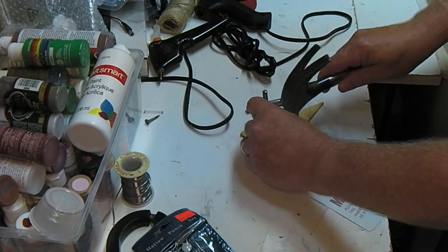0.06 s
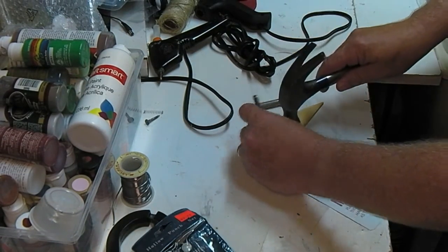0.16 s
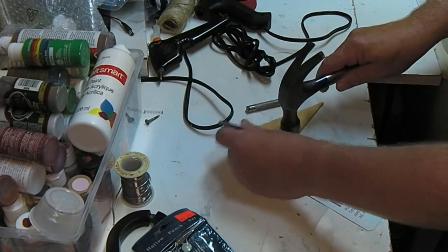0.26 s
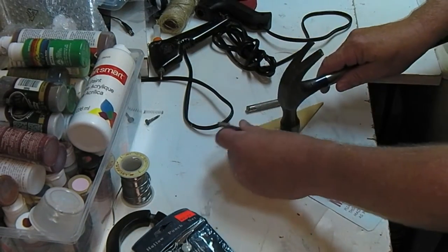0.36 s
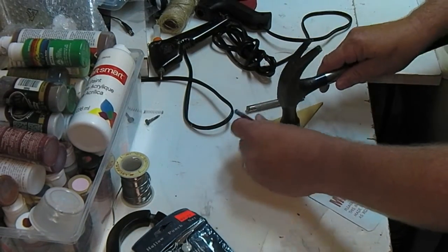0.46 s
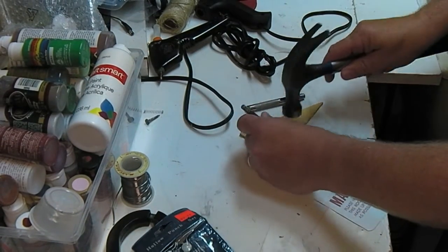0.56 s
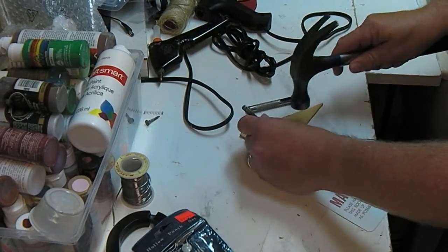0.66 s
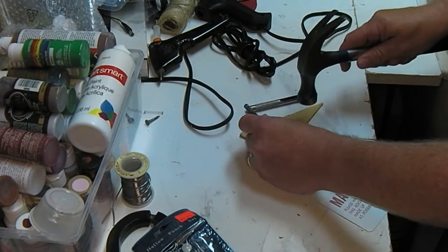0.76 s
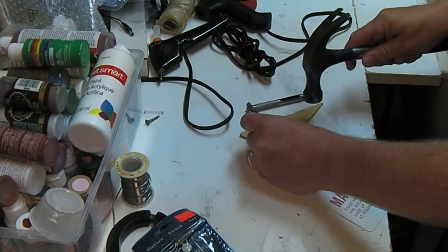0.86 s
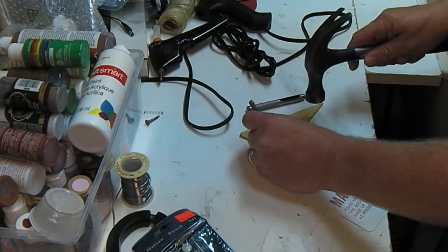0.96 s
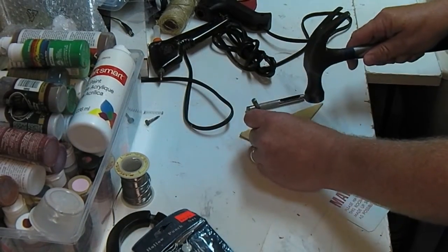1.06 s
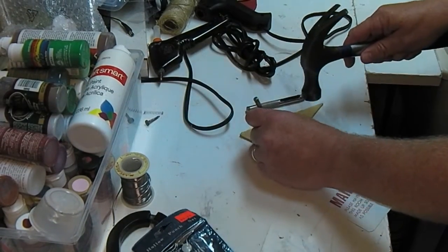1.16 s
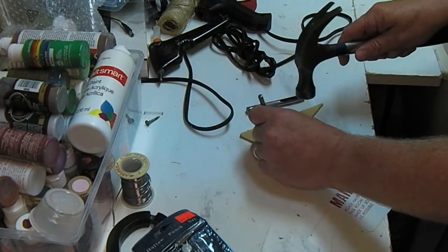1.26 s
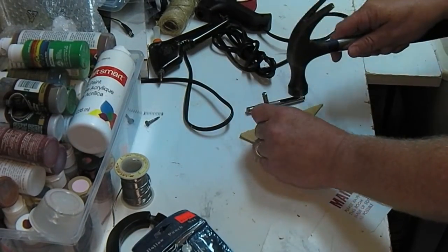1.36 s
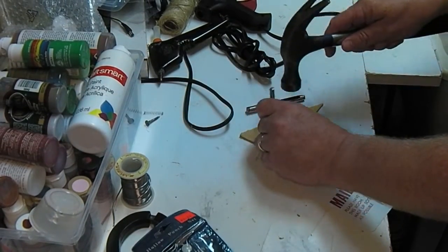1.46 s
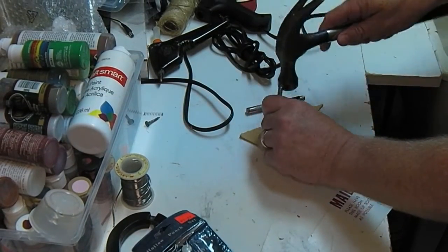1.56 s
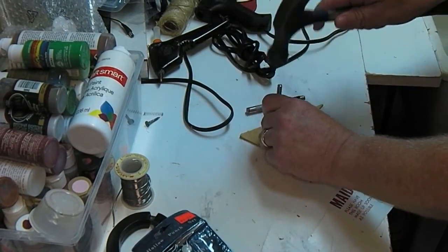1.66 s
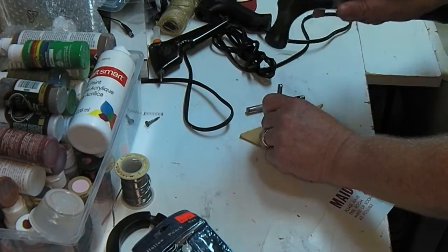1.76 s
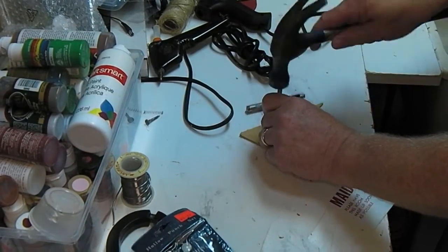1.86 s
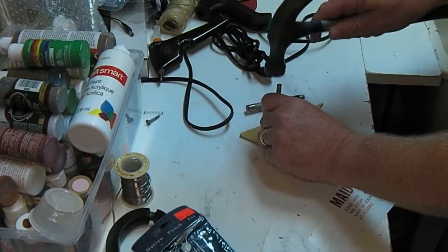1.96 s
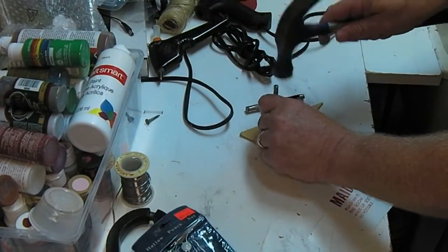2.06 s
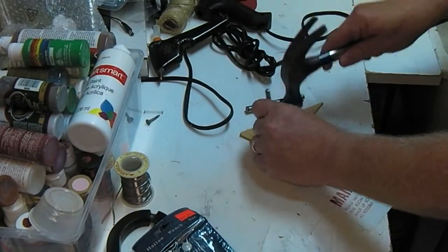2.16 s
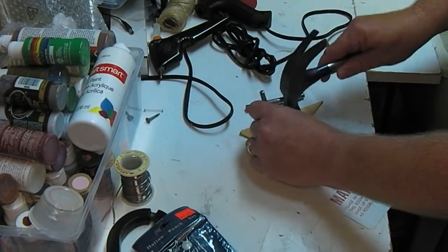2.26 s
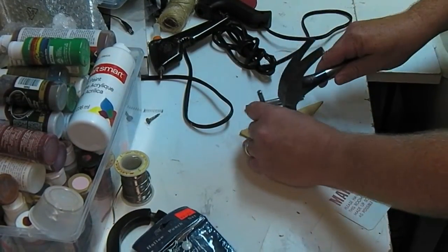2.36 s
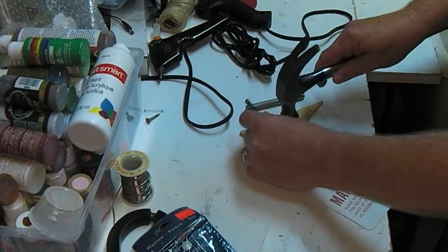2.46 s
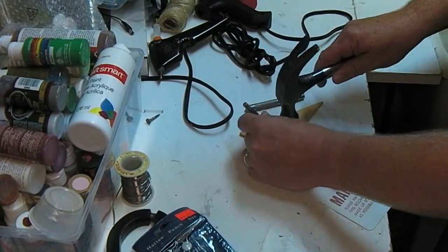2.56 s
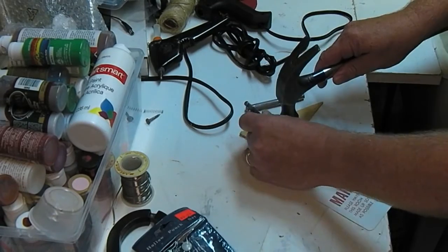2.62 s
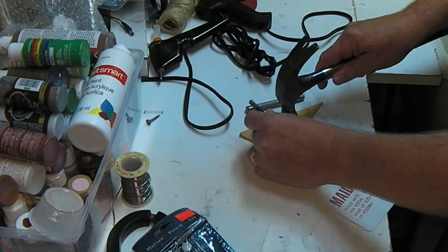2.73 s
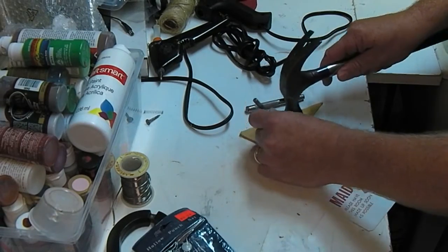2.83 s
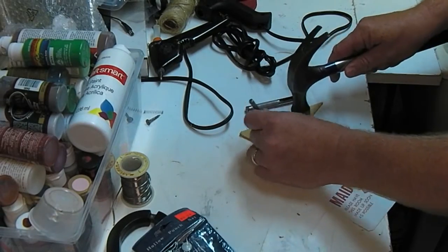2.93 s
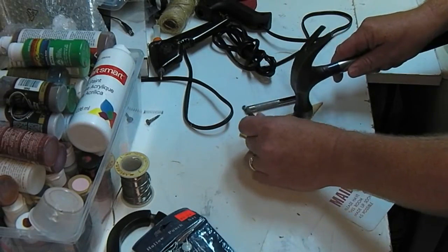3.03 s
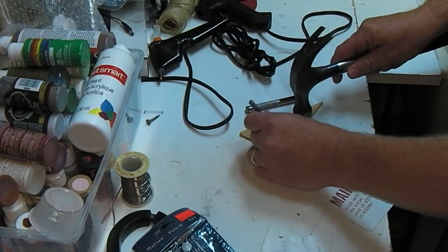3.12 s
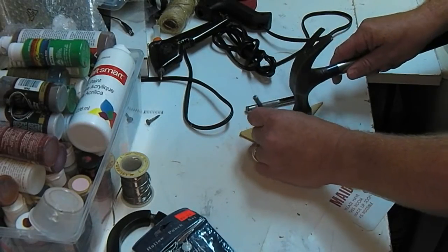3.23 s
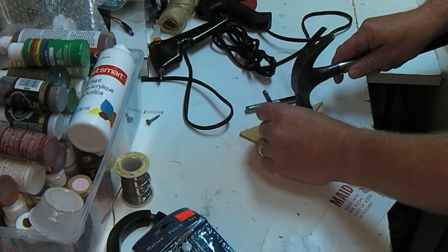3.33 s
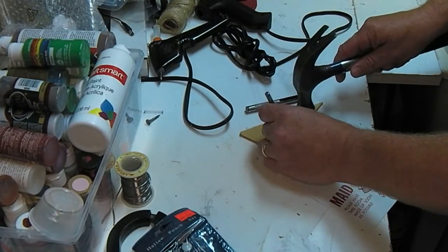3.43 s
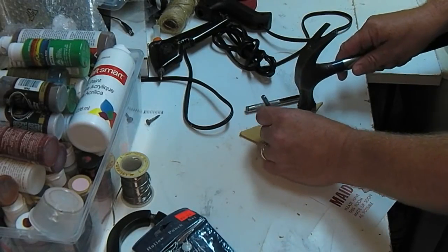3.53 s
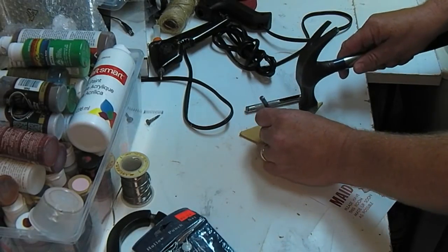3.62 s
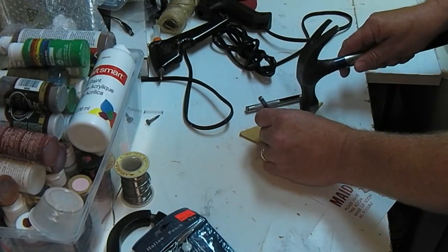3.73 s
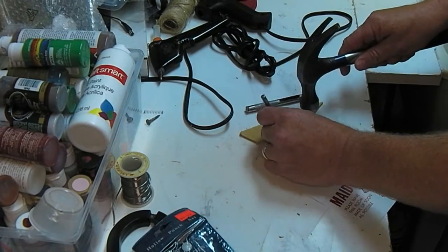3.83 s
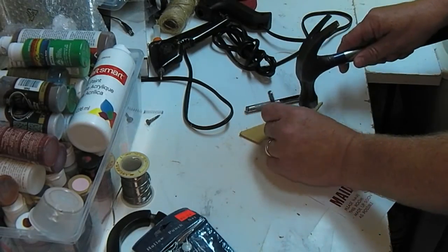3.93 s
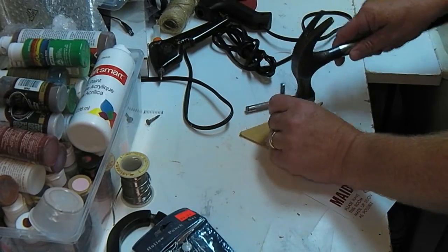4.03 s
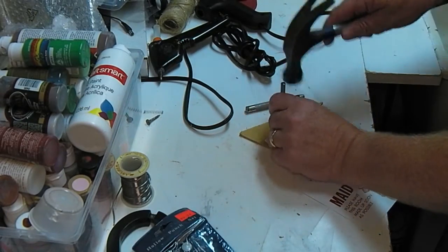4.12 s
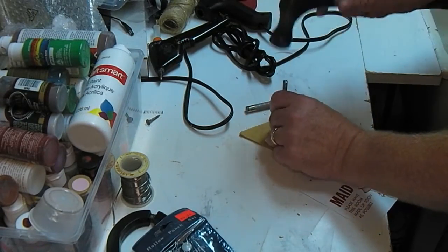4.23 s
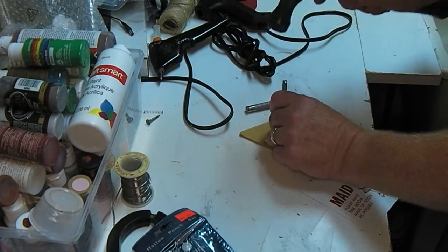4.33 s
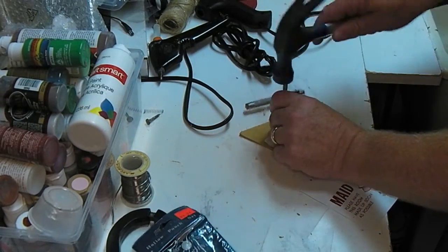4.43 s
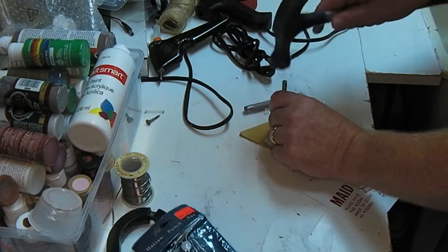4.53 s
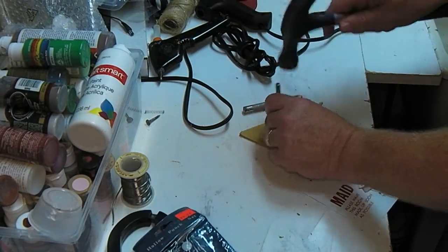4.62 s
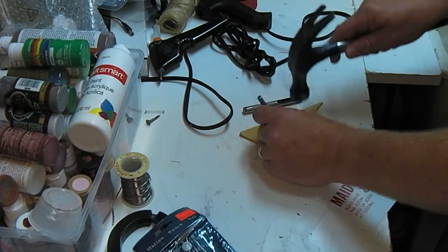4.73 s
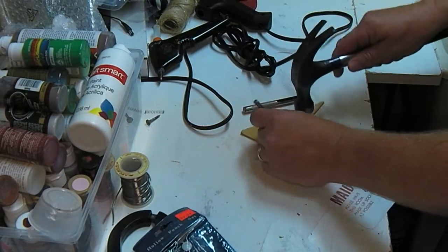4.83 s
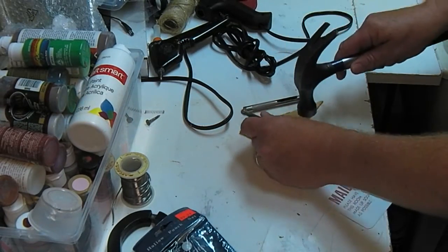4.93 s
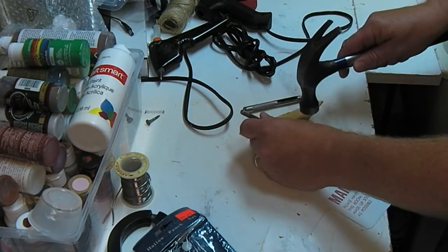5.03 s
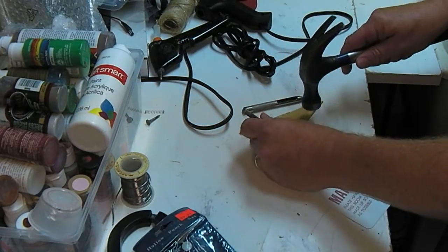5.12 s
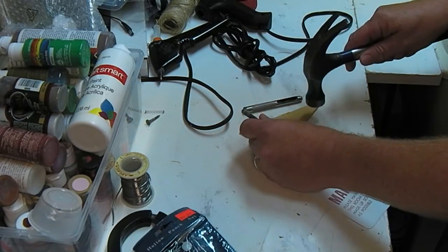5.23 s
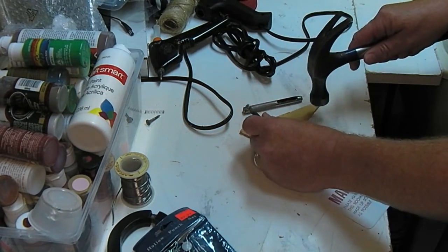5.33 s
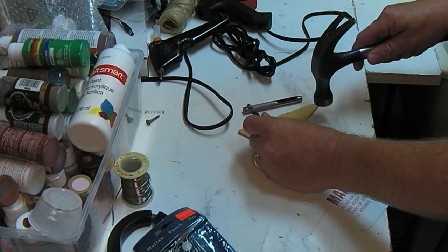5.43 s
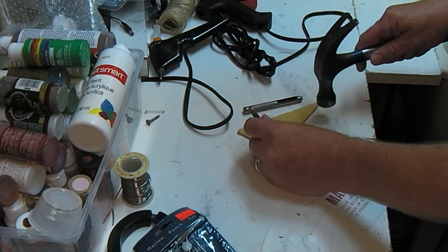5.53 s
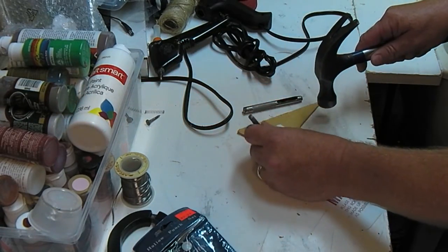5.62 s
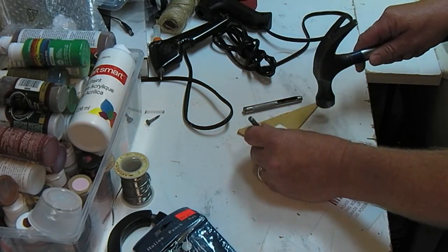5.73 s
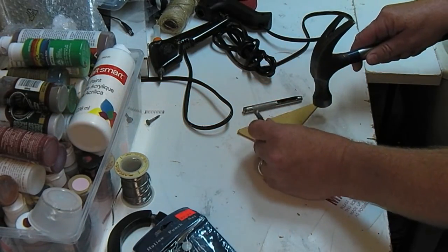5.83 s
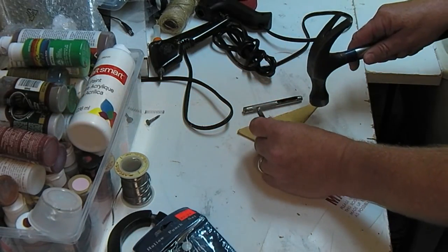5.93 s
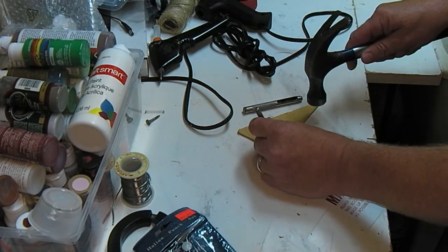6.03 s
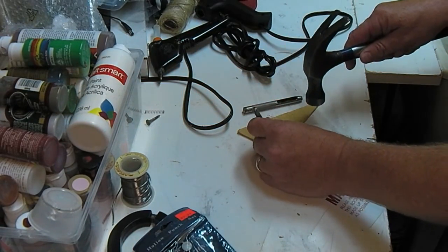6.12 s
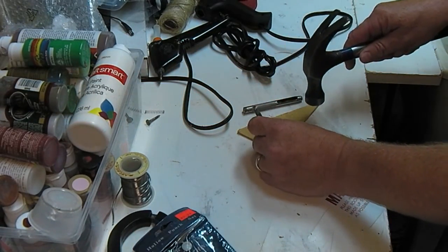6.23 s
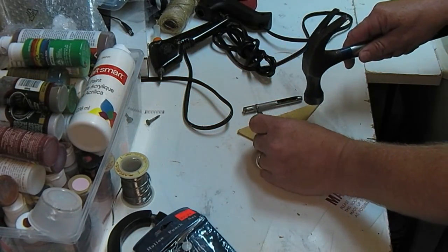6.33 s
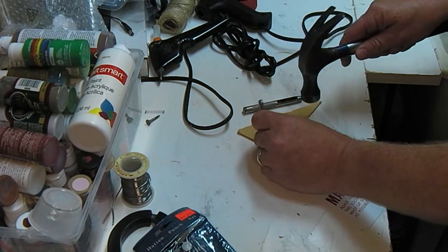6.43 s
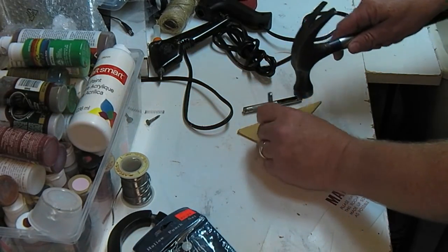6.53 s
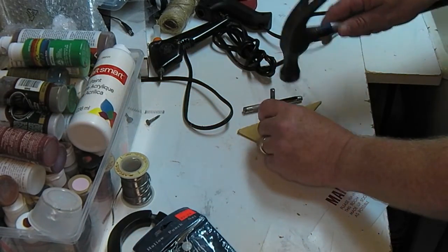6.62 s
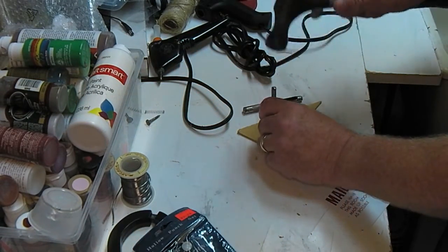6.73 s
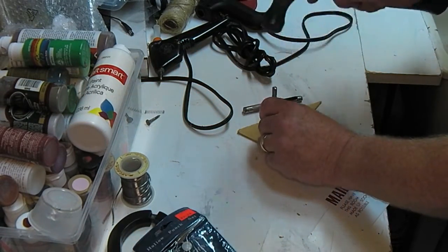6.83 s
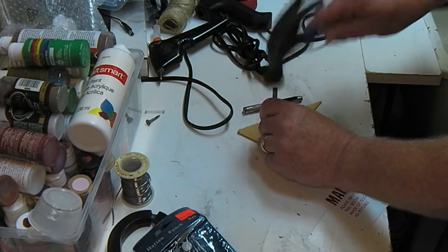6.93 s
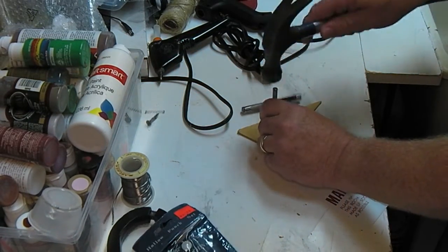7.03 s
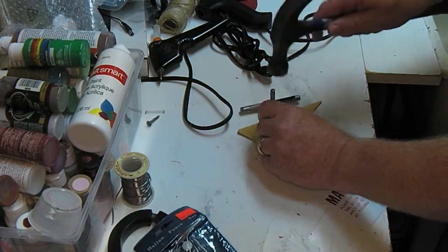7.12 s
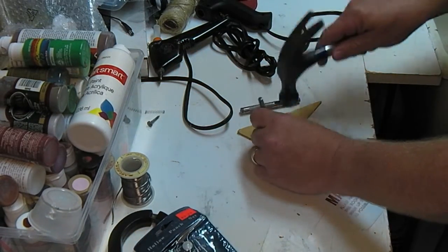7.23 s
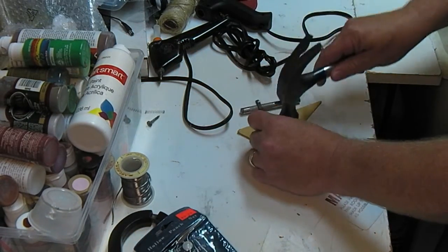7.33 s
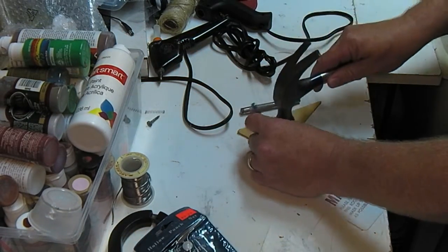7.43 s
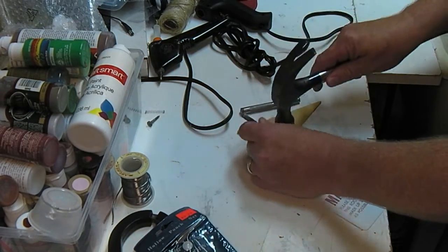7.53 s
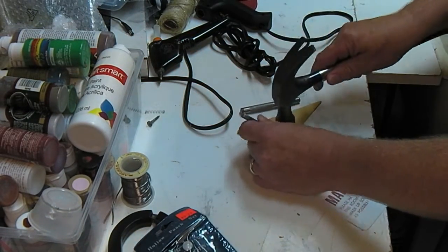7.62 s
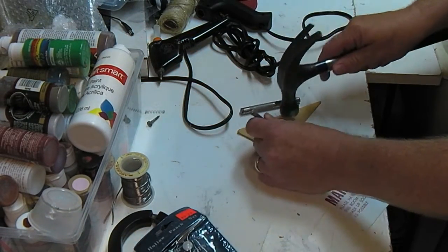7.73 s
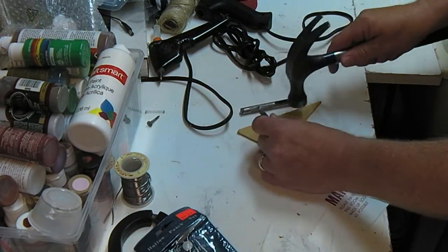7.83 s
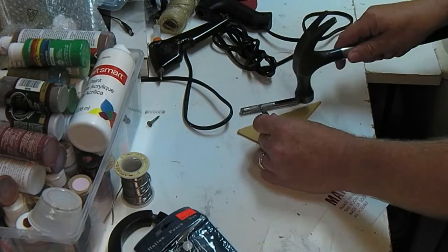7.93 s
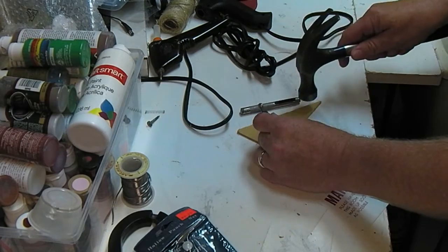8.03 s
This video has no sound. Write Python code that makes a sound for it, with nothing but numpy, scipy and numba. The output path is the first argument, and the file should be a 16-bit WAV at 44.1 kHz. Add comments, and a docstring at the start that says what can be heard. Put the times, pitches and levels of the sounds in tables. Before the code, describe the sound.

A steady room hum runs throughout, heard from close to a cluttered workbench. At about 0.1 seconds a hammer is set down with a soft thud, and a punch pulls free with a small, bright snap. At 1.9 seconds the hammer strikes the steel punch with a loud bang that overloads the microphone. The bench booms, and bottles and tools clatter for about half a second. The hammer is rested with a thud at 2.4 seconds, and the punch snaps free again just after. A second hard blow lands at 4.4 seconds, followed by bouncing clacks and the thin, high ring of a loose steel rod. The third blow, at 7 seconds, is the sharpest, with more rattling and a clearer ring from the rod. The hammer is put down softly at about 7.4 seconds, leaving only the hum until 8 seconds.

```python
"""A hammer is set down with a thud over a steady room hum, and a hollow punch snaps free.
Then three blows drive the punch into a board on a cluttered workbench, close to a small stereo camera.
Each blow overloads the input and shakes the bench: the top booms, bottles rattle, and a loose
steel rod bounces and rings. The hammer is rested after the first blow and the last;
after the first, the punch is pulled free again."""
import sys
import numpy as np
from scipy import signal
from scipy.fft import rfft, irfft, next_fast_len
from scipy.io import wavfile
from numba import njit

SR = 44100
rng = np.random.default_rng(int(sys.argv[2]) if len(sys.argv) > 2 else 0)


def generate_wav(sig):
    """Save sig (samples, or channels by samples) to the path in sys.argv[1] as 16-bit PCM at SR."""
    pcm = np.round(np.clip(np.atleast_2d(sig).T, -1, 1) * 32767).astype(np.int16)
    wavfile.write(sys.argv[1], SR, pcm)


N = 356057

# Hammer blows. Each row: start in seconds, rise in seconds, bench level in dB, smash level in dB,
# smash t60 in seconds, tilt in dB per octave, head ring in dB, head pitch ratio.
HAMMER_BLOWS = [(1.886, 0.034, -4, -4, .13, 9, 1, 0.99), (4.444, 0.024, 0, -2, .12, 8.5, -4.5, 1.4),
                (6.964, 0.013, 2, -0.5, .13, 8, 9.5, 1.06)]
# Hammer head on the punch. Each row: frequency in Hz at pitch ratio 1, level in dB, t60 in seconds.
HEAD_MODES = [(3500, -3, .008), (6600, 0, .008), (9600, -8, .005)]
# Bench top. Each row: frequency in Hz, level in dB, t60 in seconds.
BENCH_MODES = [(75.5, -36, 0.18), (115.5, -16.5, 0.26), (153, 0, 0.081), (222.5, -1.5, 0.053),
               (277, -13, 0.013), (361, 3.5, 0.056), (373, 3, 0.091), (389.4, 6, 0.044),
               (448.5, 1.5, 0.091), (514.7, 8, 0.028), (697, 3.5, 0.048)]
# Board, bottles and tools lying loose. Each row: frequency in Hz, level in dB.
CLUTTER_MODES = [(780, -2), (900, -6), (980, 0), (1200, 1), (1390, 1), (1520, 4), (1610, 3.5), (1840, 2.5),
                 (1990, 5.5), (2250, 1), (2570, 5), (2960, -3), (3350, 1.5), (3760, 2.5), (4050, -1),
                 (4600, -4), (5200, -5.5), (5700, -6.5), (6370, 0), (6900, -12), (7400, -56), (8600, -27.5),
                 (9300, -4), (10300, -9), (11500, -9), (13000, -11), (14500, -10)]
# Loose things landing. Each row: start in seconds, level in dB, tilt in dB per octave, t60 in seconds.
LANDINGS = [(1.988, -0.5, -1, .03), (2.041, -1.5, 2, 0.029), (2.08, -3.5, 0, 0.014), (2.106, -5, 5, 0.0087),
            (2.128, -7, -2, 0.018), (2.148, -19, -8, 0.015), (2.18, -18.5, -5, 0.028),
            (2.422, -27, 5, 0.011), (2.433, -24, -12, .015), (2.447, -12.5, -1, 0.026),
            (4.574, 3.5, 2, 0.019), (4.584, -1, -2, .025), (4.612, -6, 3.5, 0.055),
            (4.642, -0.5, -1.5, 0.024), (4.649, -1.5, 3.5, .025), (4.693, 1.5, 1, 0.016),
            (4.715, -17, -9, 0.014), (4.727, -3.5, 2.5, .02), (4.748, -8.5, 6.5, .025),
            (7.04, -17, -7, 0.038), (7.092, 1, 5.5, 0.043), (7.151, -4, 4, 0.016), (7.156, 1.5, 4.5, 0.032),
            (7.201, -3.5, 4.5, 0.015), (7.207, -6, 3, 0.022), (7.237, -4, 2, 0.034),
            (7.262, -5.5, -6, 0.025), (7.305, -19.5, -13, .025)]
# Steel rod. Each row: frequency in Hz, free t60 in seconds.
ROD_MODES = [(4398, .85), (8721, .6), (11900, .45)]
# The rod left ringing. Each row: start in seconds, share of the free t60, three mode levels in dB.
ROD_RINGS = [(0.0, 0.8, -54, -70, -72), (2.048, 0.49, -46, -50, -35), (2.455, 0.46, -39.5, -58, -60),
             (4.696, 0.35, -24, -44, -44), (4.773, 0.57, -25.5, -43, -59), (7.092, .3, -20, -31, -42),
             (7.156, 0.69, -28, -33, -28), (7.263, 0.38, -28.5, -43, -32)]
# Rattle after a knock. Each row: start in seconds, clutter level in dB, bench level in dB,
# seconds until it settles.
RATTLES = [(0.127, -42.5, -40, 0.01), (1.941, -20.5, -31.5, 0.25), (2.405, -28.5, -35.5, 0.054),
           (4.5, -20, -34, 0.29), (7.018, -18.5, -31.5, 0.3), (7.454, -54, -48.5, 0.017)]
# Hammer set down. Each row: start in seconds, push level in dB, contact in milliseconds,
# then bench and clack in dB relative to the push.
HAMMER_RESTS = [(0.1227, -15.5, 10.1, -17.5, -11.5), (2.3979, -8.5, 10, -3, -6),
                (7.446, -18.5, 11.44, -11, -12.5)]
# Punch coming free. Each row: start in seconds, level in dB, t60 in seconds.
PUNCH_SNAPS = [(0.232, -37.5, 0.22), (0.248, -39, 0.19), (0.2633, -20.5, 0.18), (2.5108, -22.5, 0.17),
               (2.5234, -40, 0.13)]
# Colour of a snap. Each row: frequency in Hz, spectral level in dB.
SNAP_SPECTRUM = [(290, -39), (500, -26), (760, -47), (943, -19), (1610, -5), (3170, -9), (5800, 2),
                 (7970, -3.5), (15700, -3)]
# Room air. Each row: frequency in Hz, spectral level in dB.
AIR_SPECTRUM = [(18, -73.5), (30, -27), (144, -6), (178, -15.5), (238, -9), (309, -14.5), (371, -2),
                (610, -10), (1000, -13.5), (1300, -12.5), (1650, -11), (2640, -20.5), (3920, -19.5),
                (7740, -27.5), (15700, -31.5)]
# Wavering tones in the hum. Each row: centre in Hz, width in Hz, level in dB.
HUM_TONES = [(233.5, 16, 0), (346.2, 14.8, 0.5), (526, 22, -36), (667.6, 4.4, 4), (1012, 80, -4.5),
             (1157, 21, -3.5), (1455, 34, -3), (1606, 23, -0.5), (3770, 170, -16.5)]
# Room decay. Each row: frequency in Hz, t60 in seconds.
ROOM_DECAY = [(100, 0.085), (500, 0.25), (2000, 0.18), (6000, 0.32), (15000, 0.23)]
# Stereo width of noise at the microphones. Each row: frequency in Hz, side relative to mid in dB.
SIDE_SPECTRUM = [(60, -13), (120, -7.5), (300, -14.5), (1200, -15), (2400, 0.5), (5000, -1.5), (15000, -4)]
# Microphone pair. Each row: frequency in Hz, left minus right in dB.
MIC_BALANCE = [(60, -5), (110, 0.5), (200, -2), (380, -1.5), (700, -2.0), (1290, -2.5), (2380, -2),
               (4400, 2), (8120, 0), (15000, 0.5)]

BENCH_LEAD_S = .0015  # the bench top carries the blow faster than the air
TICKS_T60_S, CLUTTER_T60_CYCLES = .55, 30
LANDING_RISE_S, LANDING_BENCH_DB = 0.0011, -22
JOLT_DB, JOLT_SHARE = (-39.5, -43.5, -41), 0.28  # rod at a landing: mode levels, share of free t60
RATTLE_KNOCKS_PER_S, RATTLE_TILT_DB_PER_OCTAVE = 1800, 1.1
CLUTTER_SAG_DB_PER_S, BENCH_SAG_DB_PER_S, SETTLE_DB_PER_S = 48, 32, 250
STIR_DB, STIR_DB_PER_S = -16, 390  # each landing stirs the rattle up again, briefly
AIR_DB, TONES_DB, ROOM_DB = -43.5, -49.5, -6.5
PORT_LAG_S, TOP_HZ = 7e-5, 16360  # sound reaches the left port first; top of the camera's range


def hammer_blows():
    """Right by the camera, everything loose jumps at once and the bench booms."""
    s, rise_s, bench_db, smash_db, t60, tilt_db = np.transpose(HAMMER_BLOWS)[:6]
    when, db, tilt_db, start = chatter(s, smash_db, t60, tilt_db, s,
                                       count=400, rise_s=rise_s[:, None], bend=2.3)
    smash = clutter(when, db, tilt_db - 96 * (when - start))  # later contacts are gentler, so duller
    # screws and caps keep ticking for a while, thin and bright
    tick_t60, tick_tilt_db = np.full_like(s, TICKS_T60_S), np.full_like(s, 7)
    ticks = clutter(*chatter(s, smash_db - 32, tick_t60, tick_tilt_db, count=500, rise_s=0.011))
    boom = bench(*chatter(s - BENCH_LEAD_S, bench_db, .75 * t60, count=60, rise_s=0.019, bend=2.86))
    return smash + ticks + boom


def hammer_head():
    """Steel shrieks briefly on steel."""
    return sum(strike(HEAD_MODES, *chatter(s, db, .05, count=80, rise_s=0.037, bend=6.4), pitch=pitch)
               for s, *_, db, pitch in HAMMER_BLOWS)


def bench(*knocks, **how):
    """Knocks on the bench top, so wide and close that the two microphones hear it differently."""
    return strike(BENCH_MODES, *knocks, apart_hz=937, **how)


def clutter(*knocks, **how):
    """Knocks on the loose things, which are heavily damped."""
    return strike([(hz, db, CLUTTER_T60_CYCLES / hz) for hz, db in CLUTTER_MODES], *knocks, **how)


def landings():
    """Each loose thing clacks as it comes down and nudges the bench."""
    s, db, tilt_db, t60 = np.transpose(LANDINGS)
    clack = clutter(*chatter(s, db, t60, tilt_db, count=20, rise_s=LANDING_RISE_S), scatter_db=3)
    return soften(clack) + bench(s, db + LANDING_BENCH_DB, scatter_db=0)


def steel_rod():
    """Thin steel tones, cut shorter when the rod lies flat; every landing jolts it too."""
    def ring_rod(s, db, share, mode_db, scatter_db):
        modes = [(hz, level, t60 * share) for (hz, t60), level in zip(ROD_MODES, mode_db)]
        return strike(modes, s, db + max(mode_db), scatter_db=scatter_db, apart_hz=30000)

    free = sum(ring_rod(s, 0, share, mode_db, scatter_db=0) for s, share, *mode_db in ROD_RINGS)
    landed_s, landed_db = np.transpose(LANDINGS)[:2]
    return free + ring_rod(landed_s, landed_db, JOLT_SHARE, JOLT_DB, scatter_db=3)


def rattle():
    """Small random knocks while the bench still moves: they sag, flare at each landing, then settle."""
    start, clutter_db, bench_db, lasts = np.transpose(RATTLES)[..., None]
    chance = rng.random((len(RATTLES), 900, 2))
    late = np.cumsum(-np.log(chance[..., 0]), axis=1) / RATTLE_KNOCKS_PER_S
    size_db = -2 * np.log(chance[..., 1]) - SETTLE_DB_PER_S * np.maximum(late - lasts, 0)
    landed_s, landed_db = np.transpose(LANDINGS)[:2]
    since = (start + late)[..., None] - landed_s
    stir_db = landed_db + STIR_DB - STIR_DB_PER_S * np.abs(since)
    stir_power = np.sum((since > 0) * undb(2 * stir_db), axis=-1)
    sag_power = undb(2 * (clutter_db - CLUTTER_SAG_DB_PER_S * late))
    clutter_db = 10 * np.log10(sag_power + stir_power) + size_db
    bench_db = bench_db - BENCH_SAG_DB_PER_S * late + size_db
    s = (start + late).ravel()
    return soften(clutter(s, clutter_db.ravel(), RATTLE_TILT_DB_PER_OCTAVE)) + bench(s, bench_db.ravel())


def hammer_rests():
    """A soft, long push: the top moves down, up and down, then rings on as loose things clack."""
    out = np.zeros((2, N))
    for s, db, ms, bench_db, clack_db in HAMMER_RESTS:
        phase = np.linspace(-3.2, 3.2, int(ms * SR / 1000))
        out[:, int(s * SR):][:, :len(phase)] += undb(db) * (1 - phase ** 2) * np.exp(-phase ** 2 / 2)
        out += bench(s + ms / 1000, db + bench_db, tilt_db=2, scatter_db=1)
        out += soften(clutter(*chatter(s, db + clack_db, 0.064, -1.0, count=20, rise_s=0.0015)))
    return out


def punch_snaps():
    """The punch pulls free in bright bursts that die away fast."""
    out, t = np.zeros((2, N)), np.arange(SR // 3) / SR
    for s, db, t60 in PUNCH_SNAPS:
        envelope = (1 - np.exp(-t / 0.0012)) * (undb(-60 * t / t60) + 0.89 * np.exp(-t / 0.0029))
        burst = stereo_noise(len(t), lambda hz: undb(curve_at(SNAP_SPECTRUM, hz)))
        out[:, int(s * SR):][:, :len(t)] += undb(db) * envelope * burst
    return out


def room_reverb(x):
    """The room around the bench: a diffuse tail in octave bands, each dying at its own pace."""
    t = np.arange(SR // 2) / SR
    tail = sum(undb(-60 * t / curve_at(ROOM_DECAY, centre))
               * stereo_noise(len(t), lambda hz: np.exp(-np.log2((hz + 1) / centre) ** 2 * 2))
               for centre in 60 * 2. ** np.arange(9))
    tail = colour(tail * (1 - np.exp(-t / 0.0045)), lambda hz: np.sqrt(hz / 2000))
    return signal.fftconvolve(x, tail / np.sqrt(np.sum(tail ** 2) / 2), axes=1)[:, :N]


def room_hum():
    """Room tone behind it all: broad air noise, with narrow bands that waver like rough tones."""
    tones = stereo_noise(N, lambda hz: np.sqrt(sum(undb(2 * db) / (1 + (2 * (hz - centre) / width) ** 4)
                                                   for centre, width, db in HUM_TONES)))
    air = stereo_noise(N, lambda hz: undb(curve_at(AIR_SPECTRUM, hz)))
    return undb(AIR_DB) * air + undb(TONES_DB) * tones


def chatter(s, db, t60, *carried, count, rise_s, bend=1):
    """Rough faces never meet once: a knock is a dying run of contacts; bend 2 holds, then drops."""
    s, db, t60, *carried = np.atleast_1d(s, db, t60, *carried)
    late = np.sort(rng.random((len(s), count)), axis=1) * t60[:, None] * .7
    late -= late[:, :1]
    rise_db = 20 * np.log10(np.minimum(0.017 + late / rise_s, 1))
    db = db[:, None] - 60 * (late / t60[:, None]) ** bend + rise_db
    return [(s[:, None] + late).ravel(), db.ravel()] + [np.repeat(column, count) for column in carried]


def strike(modes, s, db, tilt_db=0., scatter_db=5., apart_hz=2700., pitch=1):
    """Knocks on a body: each lands elsewhere, so its modes get new sizes."""
    hz, mode_db, t60 = np.transpose(modes) * [[pitch], [1], [1]]
    s, db, tilt_db = np.broadcast_arrays(*np.atleast_1d(s, db, tilt_db))
    order = np.argsort(s)
    chance = rng.standard_normal((len(s), 3, len(hz)))
    size = undb(db[:, None] + mode_db + tilt_db[:, None] * np.log2(hz / 2000) + scatter_db * chance[:, 0])
    size *= np.sign(chance[:, 1]) / np.sqrt(np.sum(undb(2 * mode_db)))
    # left and right part in phase as a mode nears apart_hz
    turn = np.exp(1j * chance[:, 2] * np.minimum(hz / apart_hz, 1.5) ** 2)
    push = np.array([size * turn, size / turn])[:, order]
    pole = np.exp(2j * np.pi * hz / SR - np.log(1000) / (t60 * SR))
    return ring_modes((s[order] * SR).astype(np.int64), push, pole, np.zeros((2, N)))


@njit
def ring_modes(start, push, pole, out):
    """Every mode is a decaying rotation, pushed at each start sample; silent stretches are skipped."""
    for channel in range(2):
        for mode in range(len(pole)):
            z, knock, i = 0j, 0, start[0]
            while i < out.shape[1]:
                z *= pole[mode]
                while knock < len(start) and start[knock] == i:
                    z += push[channel, knock, mode]
                    knock += 1
                out[channel, i] += z.imag
                i += 1
                if abs(z.real) + abs(z.imag) < 1e-6:
                    i = start[knock] if knock < len(start) else out.shape[1]
    return out


def soften(x, cutoff_hz=6000):
    """Wood and plastic contacts last too long to drive the high treble."""
    return signal.sosfilt(signal.butter(2, cutoff_hz, fs=SR, output="sos"), x)


def stereo_noise(size, gain):
    """Noise of rms 1 at the two microphones: mostly shared in the bass, wide in the treble."""
    mid, side = rng.standard_normal((2, size))
    side = colour(side, lambda hz: undb(curve_at(SIDE_SPECTRUM, hz)))
    pair = colour(np.array([mid + side, mid - side]), gain)
    return pair / pair.std()


def colour(x, gain):
    """Filter by gain(Hz)."""
    size = next_fast_len(x.shape[-1])
    return irfft(rfft(x, size) * gain(np.arange(size // 2 + 1) * SR / size), size)[..., :x.shape[-1]]


def curve_at(table, hz):
    """Read a (Hz, value) table on a log-frequency axis."""
    table_hz, values = np.transpose(table)
    return np.interp(np.log(hz + 1), np.log(table_hz + 1), values)


def undb(db):
    return 10 ** (np.asarray(db) / 20)


def scene():
    """The workbench from close up, with the room behind it."""
    knocks = hammer_blows() + landings() + rattle() + hammer_rests() + steel_rod()
    return knocks + undb(ROOM_DB) * room_reverb(knocks) + hammer_head() + punch_snaps() + room_hum()


def record(dry):
    """The camera's microphone pair, a slow gain control, hard overload and a top cut."""
    x = np.array([colour(channel, lambda hz: undb(sign * curve_at(MIC_BALANCE, hz) / 2)
                         * np.exp(1j * sign * np.pi * hz * PORT_LAG_S))
                  for channel, sign in zip(dry, (1, -1))])
    x = signal.sosfilt(signal.butter(2, 45, "high", fs=SR, output="sos"), x)  # small capsules lose bass
    smoothing = np.exp(-1 / (.8 * SR))
    loudness = signal.lfilter([1 - smoothing], [1, -smoothing], np.minimum(np.abs(x).mean(0), 1))
    x = x * undb(-4.5 * np.tanh(loudness / 0.13))  # the gain sinks after loud knocks
    return signal.sosfilt(signal.ellip(8, .2, 70, TOP_HZ, fs=SR, output="sos"), np.clip(x, -1, 1))


dry = scene()
out = record(dry)
generate_wav(out)
```